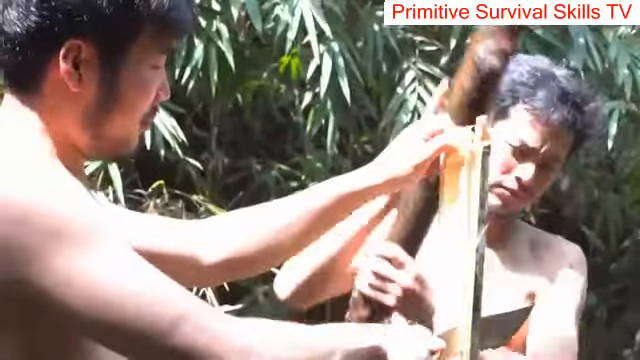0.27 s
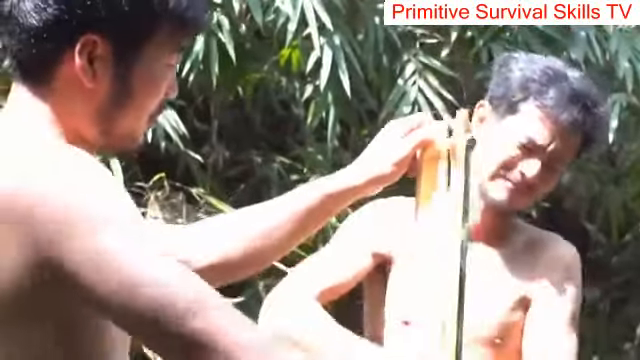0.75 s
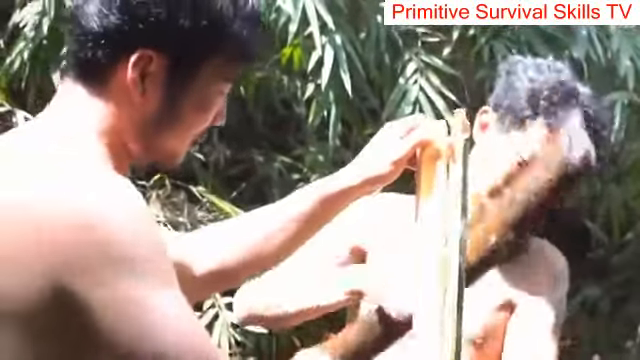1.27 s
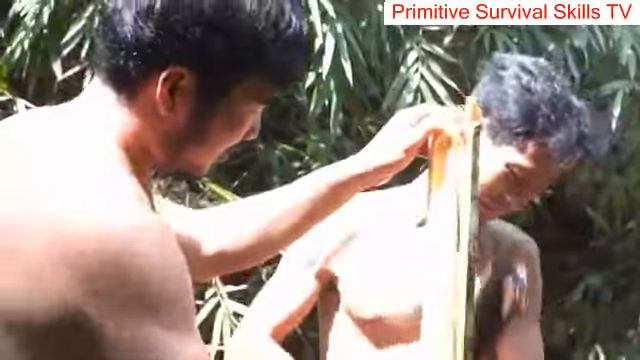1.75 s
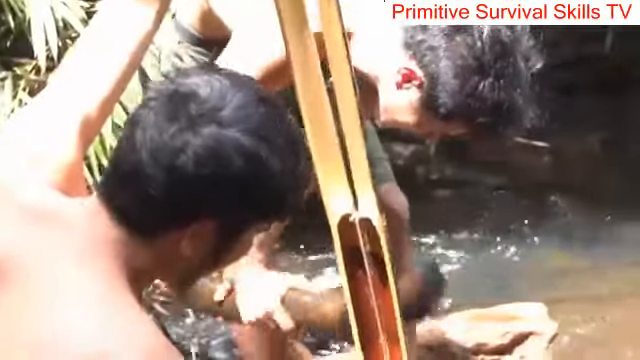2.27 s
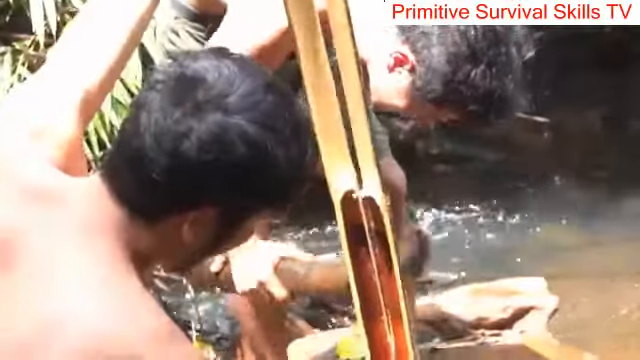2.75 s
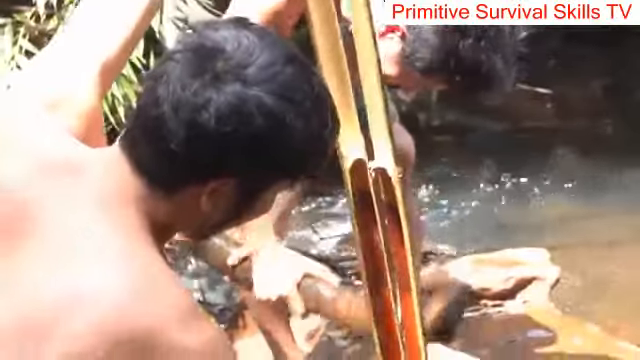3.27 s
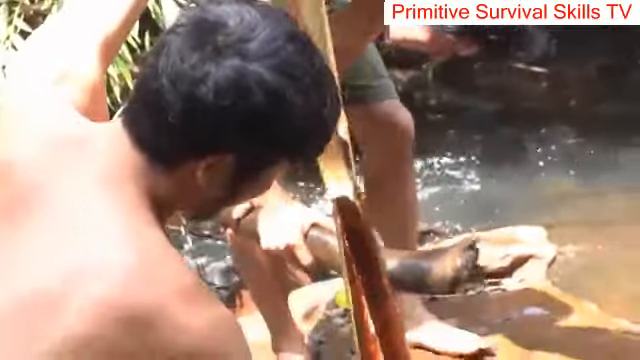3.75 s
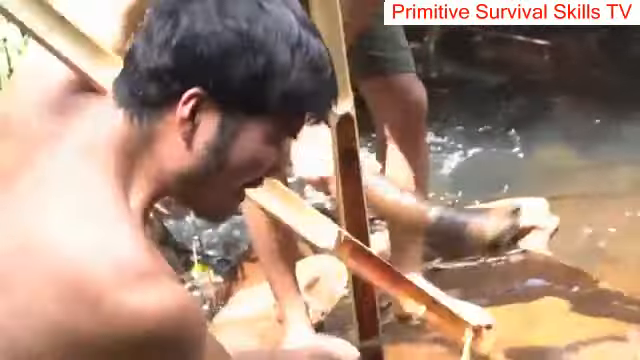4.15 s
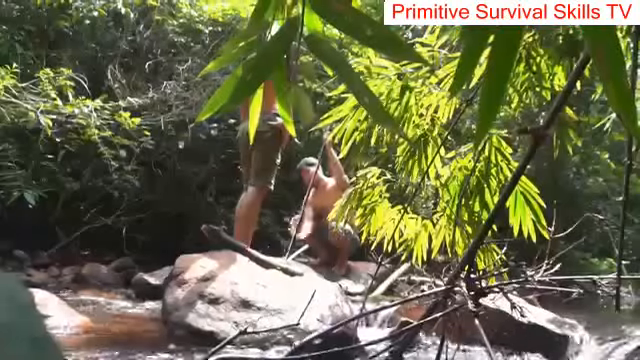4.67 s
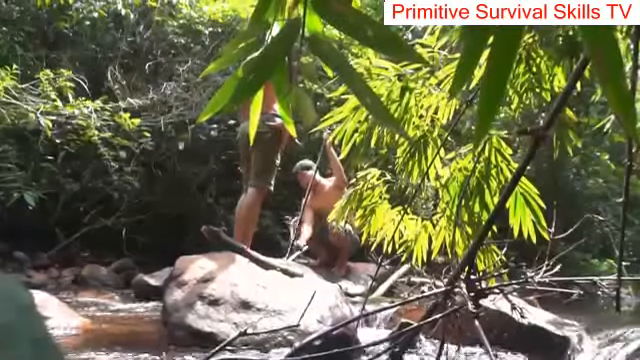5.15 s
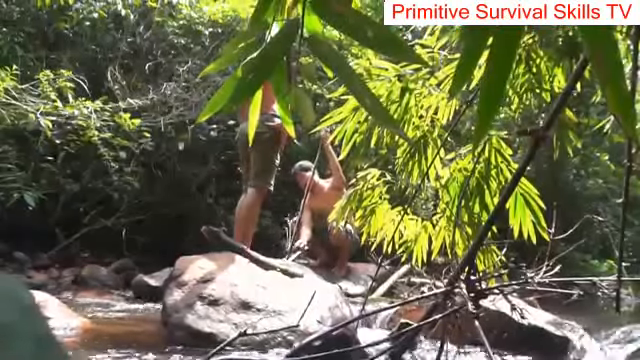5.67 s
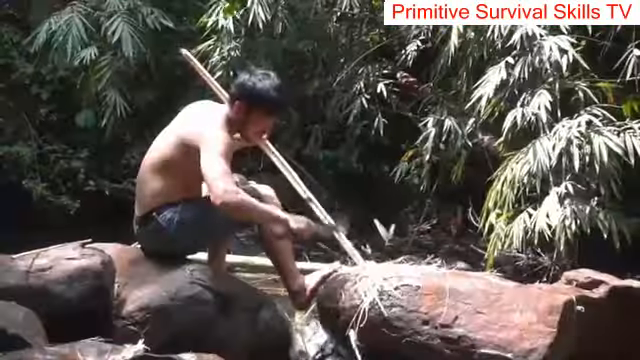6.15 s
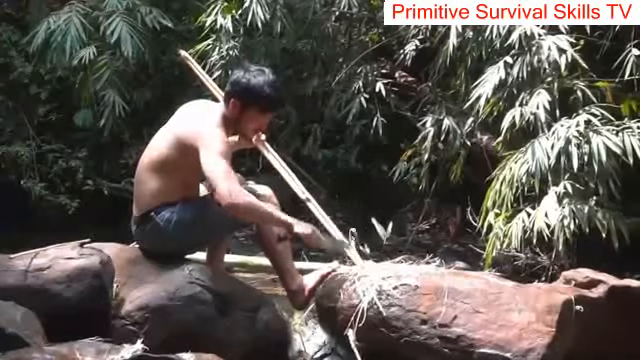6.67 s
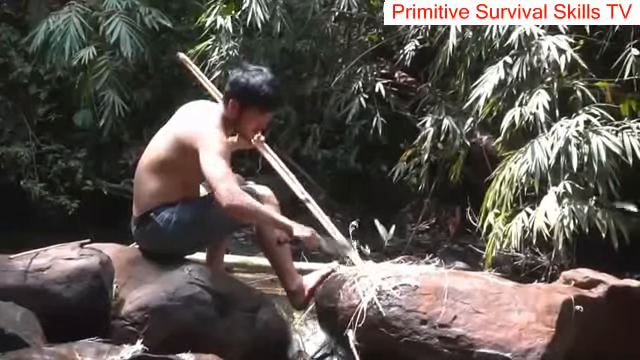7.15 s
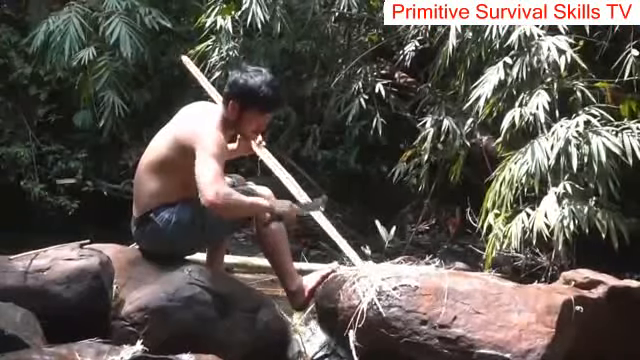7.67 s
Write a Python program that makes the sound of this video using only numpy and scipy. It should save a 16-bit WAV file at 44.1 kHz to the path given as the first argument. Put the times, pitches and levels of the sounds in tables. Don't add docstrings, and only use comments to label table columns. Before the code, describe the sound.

Six blows crack and split a hollow bamboo pole beside a fizzing, bubbling rocky stream, then louder rapids and a last tiny splintering.

```python
import sys
import numpy as np
from scipy import signal
from scipy.fft import rfft, irfft, next_fast_len
from scipy.io import wavfile
from scipy.ndimage import uniform_filter1d

SR = 44100
rng = np.random.default_rng(int(sys.argv[2]) if len(sys.argv) > 2 else 0)


def decibels_to_gain(level_db):
    exponent = np.asarray(level_db, float) / 20
    return 10 ** exponent


def transcribe(signal):
    frames = np.atleast_2d(signal).T
    limited = np.clip(frames, -1, 1)
    pcm = np.round(limited * 32767).astype(np.int16)
    wavfile.write(sys.argv[1], SR, pcm)


N = 348390
EDGE_HZ, TOP_HZ = 7035, 8220

# time in seconds, level in dB.
STREAM_LEVEL = [
    [(0.0, -40), (0.53, -40), (0.95, -38), (1.16, -40.5), (1.63, -38.5), (2.0, -40)],
    [(2.0, -39), (4.4, -38.5), (4.49, -37.5)],
    [(4.49, -34), (5.3, -34.5), (5.955, -34.5)],
    [(5.955, -39), (6.083, -39.5), (7.9, -40)],
]
# frequency in Hz, density in dB per Hz.
POLE_COLOUR = [(110, -40), (195, -8.5), (248, -4.5), (377, -2.5), (557, -6), (774, -2.5), (1140, -8.5),
               (1610, -11.5), (1870, -11.5), (2240, -15), (2530, -13.5), (2940, -17.5), (3570, -17),
               (7010, -26), (9110, -60), (15400, -120)]
POOL_COLOUR = [(110, -37), (195, -7.5), (479, -3.5), (591, -8), (647, -3), (822, -8), (927, -8),
               (1850, -12.5), (2210, -13), (2730, -16.5), (2980, -15), (4090, -20.5), (6220, -22.5),
               (7010, -22), (9110, -54), (15400, -120)]
RAPIDS_COLOUR = [(110, -35), (195, -6), (334, -1.5), (371, -11), (432, 0.5), (540, -3.5), (628, -8),
                 (763, -2), (941, -5.5), (1110, -4), (1230, -5.5), (1870, -6.5), (2810, -13.5), (5350, -16),
                 (7010, -21), (9110, -52), (15400, -120)]
ROCK_COLOUR = [(110, -38), (195, -8.5), (279, -6.5), (325, -3.5), (394, -9.5), (509, -4.5), (834, -7.5),
               (1080, -13), (1390, -5.5), (1610, -5.5), (2050, -9.5), (2900, -9.5), (3520, -14),
               (4150, -11.5), (7010, -15.5), (9110, -47), (15400, -120)]
# centre in Hz, width in Hz, gain in dB.
ROCK_DIPS = [(1134, 91, -1), (3450, 180, 0), (4910, 190, -4)]
# frequency in Hz, left over right in dB.
LEAN = [
    [(60, -0.5), (160, 0.0), (420, -1), (1100, -0.13), (2890, -1.4), (7610, -0.5)],
    [(60, 0.0), (160, -0.5), (420, -0.1), (1100, -1.6), (2890, -2), (7610, 0.5)],
    [(60, 1), (160, -0.5), (420, -0.5), (1100, -3.5), (2890, -3), (7610, 4)],
    [(60, 0.0), (160, 0.0), (420, 0.43), (1100, 0.42), (2890, 0.0), (7610, 1.5)],
]
# frequency in Hz, lead in radians.
LEAD = [
    [(0, 0.5), (1640, -0.2), (3620, 1.2), (3960, 1.7), (4570, 2.1), (7750, -0.1)],
    [(0, 0.15), (1460, 0.25), (3360, 1), (4220, 0.28), (6120, 0.69), (7750, -0.2)],
    [(0, -6), (1640, 0.67), (2410, 0.5), (5340, -1), (7150, -2), (7750, 3.5)],
    [(0, 0), (2240, 0.27), (2930, -0.0033), (4570, -0.2), (5250, -0.6), (7750, 0.1)],
]
BRIGHT_DB_PER_OCT = [1.43, 0.67, 0.56, -1.07]
WIDTH_DB = [-0.9, 0.9, 0.047, -1.5]
# frequency in Hz, level in dB relative to the shared part.
APART = [(200, -24), (260, -23), (480, -18.5), (950, -12), (1910, -6.5), (3810, -2.5), (7610, -1.5)]
# time of the top in seconds, level in dB.
JOLTS = [(0.02, -62), (0.8, -58), (0.9, -60), (1.58, -58), (1.67, -60), (2.22, -60), (2.58, -60),
         (2.66, -65), (3.1, -52), (3.48, -53.5), (3.76, -64), (4.03, -58.5), (4.12, -56), (4.22, -68),
         (5.08, -62), (5.21, -62), (5.75, -61), (6.18, -68.5), (7.6, -69)]
# start in seconds, peak in dB, pitch in Hz, t60 in seconds, left over right in dB.
PLOPS = [(0.045, -31.5, 765, 0.093, 0), (0.248, -30.5, 850, 0.038, -4), (0.399, -34.5, 714, 0.029, -1),
         (0.492, -34.5, 460, 0.035, 0), (4.394, -26, 1040, 0.061, 0), (4.448, -31, 355, 0.04, 4),
         (4.518, -26.5, 976, 0.027, 1), (4.95, -26, 1070, 0.035, 0), (5.189, -28, 780, 0.086, 1.5),
         (5.361, -25.5, 984, 0.058, -1), (5.449, -29.5, 281, 0.12, -1.5), (5.755, -26.5, 843, 0.11, -1.5),
         (5.919, -28.5, 1320, 0.038, 2), (7.066, -33, 1450, 0.035, -1)]
# start in seconds, peak in dB, pitch in Hz, left over right in dB.
DRIPS = [(0.639, -35.5, 1890, 1), (5.094, -36, 2490, 2), (5.17, -29, 2000, -8), (5.29, -31, 1540, -14),
         (5.7515, -29.5, 2470, -5.5), (6.042, -31.5, 3790, 9), (6.044, -39, 4040, 7), (6.046, -33, 3530, 5),
         (7.008, -26.5, 1560, 2), (7.7545, -35, 1850, 6), (7.8096, -35.5, 2570, -5)]
# start in seconds, peak in dB.
BIRD_CALLS = [
    (0.106, -37.5),
    (0.908, -39),
    (1.67, -43),
]
# start in seconds, peak in dB, pitch in Hz, t60 in seconds, wall modes in dB.
KNOCKS = [(0.767, -23.5, 812, 0.061, -0.5), (.796, -33, 894, 0.034, -1), (1.5645, -29, 787, 0.077, 1),
          (1.5696, -28, 780, 0.056, -12), (1.5722, -34, 774, 0.047, -17), (1.596, -27, 760, 0.026, 0),
          (1.602, -29.5, 900, 0.043, 6), (1.610, -31, 566, 0.05, -7), (2.2172, -20.5, 690, 0.019, -6),
          (2.6218, -12.5, 730, 0.015, -20), (2.642, -27, 876, 0.029, -23), (3.0818, -12, 724, 0.009, -25),
          (3.467, -32, 717, 0.03, -1), (3.4735, -29, 770, 0.035, 1), (3.4905, -18, 775, 0.022, -12),
          (3.4955, -27, 950, .015, 1.5), (4.09, -39, 578, .06, -7), (0.772, -23.5, 361, 0.041, 0.1),
          (0.8, -28.5, 433, 0.04, -1), (1.6, -27, 305, 0.04, 2), (2.2137, -29, 433, 0.02, -4),
          (2.625, -24.5, 267, 0.046, -2)]
# multiple of the pitch, level in dB, t60 in seconds.
CULM_MODES = [(1.721, -10, 0.028), (2.2, -9.5, 0.0057), (2.85, -8.5, 0.011), (3.25, -14.5, 0.029),
              (3.95, -16.5, 0.0054)]
# start in seconds, peak in dB, frequency in Hz, t60 in seconds.
WALLS = [(2.6205, -26, 1270, .025), (2.6203, -23, 1650, .012), (2.6195, -25, 2080, .015),
         (2.6185, -29, 2410, .015), (3.0804, -19, 715, .008), (3.0817, -19.5, 1280, .014),
         (3.0818, -18.5, 1980, .007), (3.0795, -22, 2460, .02), (3.079, -27, 3050, .012),
         (3.489, -30, 1560, .025), (3.489, -29, 2430, .02), (3.489, -27, 3040, .02),
         (3.4895, -30, 5900, .015), (1.59, -31, 1700, .03), (1.603, -29, 2200, .03),
         (1.606, -31, 1250, .03), (1.604, -31, 3350, .025), (.79, -23, 2650, .03), (.793, -24, 1200, .03)]
# start in seconds, rms in dB, rise in seconds, t60 in seconds, brightness in dB per octave.
TEARS = [(.770, -29.5, 0.0014, 0.24, -2.5), (0.787, -24, 0.0035, 0.17, 0.5), (.824, -28, 0.0023, 0.22, 1.5),
         (.84, -33.5, 0.011, 0.3, 3), (1.582, -27, 0.014, 0.12, -3), (1.604, -33.5, 0.0058, 0.27, -3),
         (2.214, -34.5, 0.0059, 0.11, 1.5), (2.227, -30.5, 0.0018, 0.1, -3.5),
         (2.246, -38.5, .002, 0.22, 1), (2.622, -31.5, 0.0026, .15, 4), (2.64, -33.5, 0.0016, 0.16, -5.5),
         (3.082, -29.5, 0.0024, 0.085, -5), (3.09, -30.5, 0.0026, 0.079, 4.5),
         (3.098, -38.5, 0.01, 0.35, 6.5), (3.467, -34.5, 0.0018, .1, -4.5), (3.491, -31, 0.0029, .15, 1.5),
         (4.059, -41, 0.025, 0.51, 0.5), (4.775, -35.5, 0.025, 0.2, 3.5), (5.252, -39.5, 0.014, 0.27, 3),
         (7.574, -31, 0.001, 0.07, 8), (7.583, -38, 0.0035, 0.13, 10.5)]
# frequency in Hz, density in dB per Hz.
FIBRE_COLOUR = [(180, -37), (300, -11), (361, -6), (850, -5), (1850, -4), (2050, -4.5), (4650, -10),
                (7000, -14.5), (9100, -42), (15400, -120)]
# start in seconds, ring peak in dB, ring in Hz, click peak in dB.
SNAPS = [(.7885, -20, 5110, -7), (0.7918, -19.5, 2610, -26.5), (0.7945, -18.5, 3320, -13),
         (0.801, -24, 2094, -25.5), (.8055, -26, 5310, -21), (0.8255, -28, 5520, -19),
         (1.5835, -20, 3450, -22), (1.585, -31, 5500, -29), (1.591, -22, 3360, -18),
         (1.5915, -27, 5900, -24), (1.599, -30, 5840, -23), (1.607, -24.5, 2330, -22),
         (2.2175, -25, 2940, -37), (2.2258, -23, 2375, -15), (2.226, -28.5, 4590, -26),
         (2.2262, -28, 6840, -30), (2.2445, -25.5, 6230, -12.5), (2.2445, -26.5, 2410, -32.5),
         (2.621, -25, 2840, -27), (2.627, -29.5, 5380, -32.5), (2.6398, -36, 6220, -24),
         (2.642, -36, 5600, -24), (3.081, -25, 3340, -28), (3.0885, -22, 5100, -14),
         (3.089, -23, 6340, -25), (3.093, -24.5, 1886, -31.5), (3.098, -26.5, 2290, -30.5),
         (3.101, -29.5, 2590, -31.5), (3.1095, -30, 5600, -27), (3.1105, -33, 4120, -34),
         (3.4683, -23.5, 2180, -22.5), (3.477, -27, 2170, -31), (3.4905, -18.5, 2040, -13.5),
         (3.491, -21.5, 3370, -16.5), (3.4925, -20.5, 6780, -24), (3.491, -15.5, 7170, -28),
         (3.497, -23, 6260, -24), (.8305, -27, 3120, -24), (.837, -28, 4030, -24), (.846, -30, 4900, -24),
         (.8335, -29, 5600, -25), (.853, -30, 5200, -27), (.8615, -32.5, 3500, -25.5)]
# start in seconds, ring peak in dB, ring in Hz.
TICKS = [(.907, -34, 5560), (.910, -31, 2410), (1.564, -35, 6550), (2.686, -33.5, 3520),
         (4.074, -32.5, 4510), (4.0795, -39, 4300), (4.1055, -39, 6370), (4.118, -34.5, 1900),
         (3.175, -36, 6300), (4.0865, -26.5, 3030), (4.097, -32, 6760), (4.0968, -26, 4710),
         (4.098, -27.5, 3030), (4.119, -35, 3550), (4.227, -32, 3150), (5.678, -31, 6270),
         (5.754, -27.5, 3050), (6.157, -33, 5240), (7.574, -29, 4050), (7.5755, -35, 6050),
         (7.5745, -31, 6750), (7.5762, -28, 6750), (7.5785, -35, 5500), (7.5752, -29.5, 2400),
         (7.5775, -34, 3130), (7.578, -37, 3660)]
# frequency in Hz, gain in dB.
MIC_CUT = [(20, -43), (60, -36), (120, -17), (165, -10.5), (195, 1)]
# low edge in Hz, high edge in Hz.
MONO_BAND_HZ = (175, 1000)
MONO_ODDS = (-0.3, 0.8)
# start in seconds, end in seconds, level in dB.
LEAKS = [
    (.772, 0.811, -28.5),
    (1.57, 1.613, -23.5),
    (2.201, 2.255, -9),
    (2.619, 2.649, -25),
    (3.068, 3.096, -20.5),
    (3.464, 3.504, -19),
    (5.67, 5.69, -11.5),
    (7.566, 7.595, -20),
]


def evened(x):
    return x / np.sqrt(np.mean(np.abs(x) ** 2) + 1e-20)


def read(points, hz):
    f, value = np.transpose(points)
    return np.interp(np.log(hz + 1), np.log(f + 1), value)


def add(mix, start_s, sound):
    part = mix[:, round(start_s * SR):][:, :sound.shape[1]]
    part += sound[:, :part.shape[1]]


def shaped(x, gain):
    size = next_fast_len(x.shape[-1] + 4096)
    spectrum = rfft(x, size) * gain(np.fft.rfftfreq(size, 1 / SR))
    return irfft(spectrum, size)[..., :x.shape[-1]]


def smoothed(x, size, axis=-1):
    return uniform_filter1d(x, size, axis)


def swell(t, rise_s, t60_s):
    rise = np.sin(np.pi / 2 * np.clip(t / rise_s, 0, 1)) ** 2
    return rise * decibels_to_gain(-60 * np.maximum(t - rise_s, 0) / t60_s)


def panned(x, left_db):
    return x * decibels_to_gain(np.array([[left_db / 2], [-left_db / 2]]))


def two_ports(size, apart, colour):
    shared, *own = rng.standard_normal((3, size))
    return shaped(shared, colour) + apart * shaped(np.array(own), lambda f: colour(f) * f / (f + 2500))


def bubble(hz, t60_s, glide):
    t = np.arange(int((t60_s + 2 / hz) * SR)) / SR
    cycles = hz * (t + glide * t ** 2 / (2 * t60_s))
    return swell(t, 1.41 / hz, t60_s) * np.sin(2 * np.pi * cycles)


def fizz(per_cycle=0.07, cycles=19, spread_db=4.6, count=36):
    out = np.zeros(N)
    for hz in np.geomspace(200, 7400, count):
        when, luck = rng.random((2, int(per_cycle * hz * N / SR)))
        hits = np.zeros(N)
        hits[(when * N).astype(int)] = decibels_to_gain(spread_db * np.minimum(-np.log(1 - luck), 4))
        t60_s = cycles * (hz / 1000) ** 0.38 * rng.uniform(0.52, 2.45) / hz
        grain = bubble(hz, t60_s, rng.uniform(-0.069, 0.26))
        out += signal.oaconvolve(hits, grain / np.linalg.norm(grain))[:N]
    return evened(out)


def stream(near=0.24, patchy_db=0.88):
    water = [np.sqrt(near) * fizz() + np.sqrt(1 - near) * rng.standard_normal(N) for _ in range(2)]
    hz, t, (mid, side) = signal.stft(np.array(water), SR, nperseg=1024, noverlap=768)
    power = np.mean(abs(mid) ** 2 + abs(side) ** 2, 1) / 2
    even = np.sqrt(np.mean(abs(mid) ** 2) / smoothed(power, 3))[:, None]
    mid, side = mid * even, side * even
    patches = evened(smoothed(smoothed(rng.standard_normal(mid.shape), 14, 0), 14, 1))
    rock_dips = sum(db * np.exp(-((hz - f) / width) ** 2) for f, width, db in ROCK_DIPS)
    inside, out = np.clip(hz, 200, 6900), np.zeros((2, N))
    heard = (hz > 200) & (hz < EDGE_HZ)
    octaves = np.log2(np.maximum(hz, 1000) / 1000)[:, None]
    lead_share = np.clip(hz / 1000 - 0.5, 0, 1)
    colours = (POLE_COLOUR, POOL_COLOUR, RAPIDS_COLOUR, ROCK_COLOUR)
    places = zip(STREAM_LEVEL, BRIGHT_DB_PER_OCT, colours, (0, 0, 0, rock_dips), WIDTH_DB, LEAN, LEAD)
    for rows, tilt_db, colour, dips_db, width_db, lean, lead in places:
        s, level_db = np.transpose(rows)
        gain = decibels_to_gain(read(colour, inside) + dips_db)
        gain /= np.sqrt(np.sum(gain[heard] ** 2) / len(hz))
        field = gain[:, None] * decibels_to_gain(np.interp(t, s, level_db) + octaves * tilt_db + patchy_db * patches)
        wide = decibels_to_gain(read(APART, hz) + width_db)[:, None]
        shared, apart = mid / np.hypot(1, wide), side * wide / np.hypot(1, wide)
        tip = (decibels_to_gain(read(lean, hz) / 2) * np.exp(0.5j * read(lead, hz) * lead_share))[:, None]
        z = np.array([(shared + apart) * tip, (shared - apart) / tip]) * field
        cut = slice(round(s[0] * SR), round(s[-1] * SR))
        out[:, cut] = signal.istft(z, SR, nperseg=1024, noverlap=768)[1][:, :N][:, cut]
    return out


def rumble(apart=0.35, rise_s=0.061, t60_s=0.4, under_stream_db=-33):
    t, (s, db) = np.arange(N) / SR, np.transpose(sum(STREAM_LEVEL, []))
    shake = sum(decibels_to_gain(top_db) * swell(t - top_s + rise_s, rise_s, t60_s) for top_s, top_db in JOLTS)
    shared, *own = rng.standard_normal((3, N))
    low = shaped(shared + apart * np.array(own),
                 lambda f: (f / (f + 60)) ** 1.8 * (f < 165) * np.sqrt(f / 100))
    return evened(low) * np.hypot(shake, decibels_to_gain(np.interp(t, s, db) + under_stream_db))


def plops(glide=0.2, drip_t60_s=0.022):
    out = np.zeros((2, N))
    drips = [(s, db, hz, drip_t60_s, left_db) for s, db, hz, left_db in DRIPS]
    for s, db, hz, t60_s, left_db in PLOPS + drips:
        add(out, s, panned(decibels_to_gain(db) * bubble(hz, t60_s, glide), left_db))
    return out


def bird(note_s=0.034, gap_s=0.094, note_hz=1282, fall_hz=210, left_db=9, late_s=0.00017):
    out, t = np.zeros((2, N)), np.arange(0, note_s, 1 / SR) - np.array([[0], [late_s]])
    cycles = note_hz * t - fall_hz * t ** 2 / (2 * note_s)
    note = np.sin(np.pi * t / note_s) ** 2 * np.sin(2 * np.pi * cycles)
    for s, db in BIRD_CALLS:
        for start_s in (s, s + gap_s):
            add(out, start_s, panned(decibels_to_gain(db) * note, left_db))
    return out


def knocks(left_db=-1.5, rise_s=0.0036):
    out, t = np.zeros((2, N)), np.arange(4000) / SR
    for s, db, hz, t60_s, wall_db in KNOCKS:
        ring = swell(t, rise_s, t60_s) * np.sin(2 * np.pi * hz * t)
        for k, mode_db, mode_t60_s in CULM_MODES:
            mode = np.sin(2 * np.pi * k * hz * t + rng.uniform(0, 2 * np.pi))
            ring += decibels_to_gain(wall_db + mode_db) * swell(t, rise_s / np.sqrt(k), mode_t60_s) * mode
        add(out, s, panned(decibels_to_gain(db) * ring, left_db))
    for s, db, hz, t60_s in WALLS:
        ring = swell(t, rise_s, t60_s) * np.sin(2 * np.pi * hz * t)
        add(out, s, panned(decibels_to_gain(db) * ring, left_db))
    return out


def tears(left_db=-0.5, apart=1.0, crackle_db=1.0):
    out, t = np.zeros((2, N)), np.arange(14000) / SR
    for s, db, rise_s, t60_s, tilt_db in TEARS:
        def colour(f):
            tilt = tilt_db * np.log2((f + 200) / 2000)
            return decibels_to_gain(read(FIBRE_COLOUR, np.clip(f, 320, 6800)) + tilt) * (f < TOP_HZ)
        hiss = two_ports(len(t), apart, colour)
        lumps = evened(smoothed(rng.standard_normal(len(t)), 60))
        crackle = evened(hiss * decibels_to_gain(crackle_db * lumps)) * swell(t, rise_s, t60_s)
        add(out, s, panned(decibels_to_gain(db) * crackle, left_db))
    return out


def fibres(snap_cycles=46, gripped_t60_s=0.0082, free_cycles=58, click_db=-2.5, click_db_per_oct=6.5):
    gripped_from_s = STREAM_LEVEL[1][0][0]
    # (s, ring dB, Hz, t60 s, click dB)
    blown = [(s, db, hz, snap_cycles / hz if s < gripped_from_s else gripped_t60_s, click)
             for s, db, hz, click in SNAPS]
    stray = [(s, db, hz, free_cycles / hz, db + click_db + click_db_per_oct * np.log2(hz / 4000))
             for s, db, hz in TICKS]
    return blown + stray


def snaps(left_db=-2.3, apart=0.74, low_hz=900, high_hz=8000, rough=0.15, grit_share=0.3,
          rise_s=0.0007, spread_s=0.000018):
    out, t = np.zeros((2, N)), np.arange(1500) / SR
    impulse = 1.0 * (np.arange(len(t)) == 30)
    for s, ring_db, hz, t60_s, click_db in fibres():
        hiss = two_ports(len(t), apart, lambda f: f / (f + low_hz) / (1 + (f / high_hz) ** 8))
        crack = shaped(impulse, lambda f: f / (f + low_hz) * (f < high_hz)) * rng.choice([-1, 1])
        grit = evened(hiss) * swell(t, rise_s, 0.55 * t60_s)
        click = crack / abs(crack).max() + grit_share * grit
        wobble = 1 + rough * evened(smoothed(rng.standard_normal(len(t)), 30))
        late_s = spread_s * rng.standard_normal((2, 1))
        ring = swell(t, rise_s, t60_s) * wobble * np.sin(2 * np.pi * hz * (t - late_s))
        add(out, s, panned(decibels_to_gain(ring_db) * ring + decibels_to_gain(click_db) * click / abs(click).max(), left_db))
    return out


def scene():
    air = stream() + plops() + bird() + knocks() + tears() + snaps()
    return shaped(air, lambda f: decibels_to_gain(read(MIC_CUT, f))) + rumble()


def narrowed(x):
    hz, t, z = signal.stft((x[0] - x[1]) / 2, SR, nperseg=2048)
    luck = evened(smoothed(smoothed(rng.standard_normal(z.shape), 5, 0), 5, 1))
    (low, high), (bar, bar_per_octave) = MONO_BAND_HZ, MONO_ODDS
    unlucky = luck > bar + bar_per_octave * np.log2((hz[:, None] + 1) / low)
    dropped = unlucky & ((hz > low) & (hz < high))[:, None]
    lost = signal.istft(z * dropped, SR, nperseg=2048)[1][:N]
    return x + np.array([-lost, lost])


def band_limit(x):
    return signal.sosfilt(signal.butter(12, 8210, fs=SR, output="sos"), x)


def record(dry, slope_db_per_khz=-14):
    top = shaped(dry, lambda f: (f > EDGE_HZ) * (f < TOP_HZ) * decibels_to_gain(slope_db_per_khz * (f - EDGE_HZ) / 1000))
    t = np.arange(N) / SR
    gate = sum(decibels_to_gain(db) * (t > start_s) * (t < end_s) for start_s, end_s, db in LEAKS)
    gate = smoothed(smoothed(gate, 150), 150)
    leak = shaped(top * gate, lambda f: f < TOP_HZ)
    limited = narrowed(shaped(dry, lambda f: f < EDGE_HZ))
    return band_limit(limited + leak)


dry = scene()
out = record(dry)
transcribe(out)
```